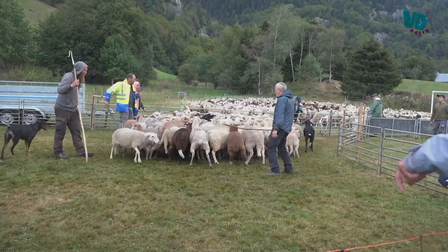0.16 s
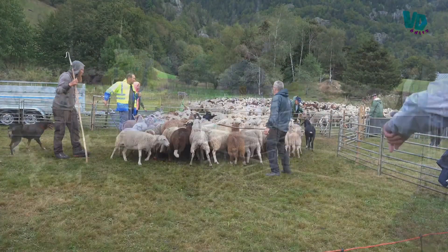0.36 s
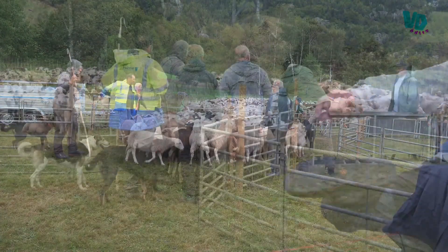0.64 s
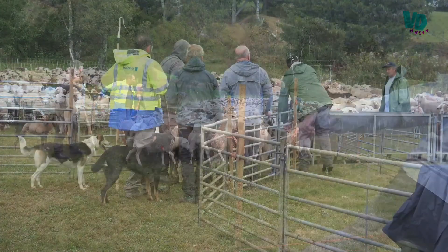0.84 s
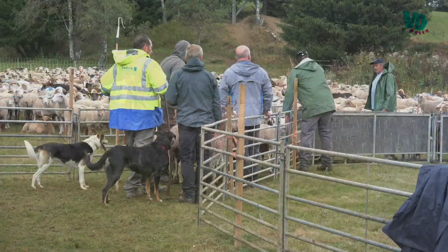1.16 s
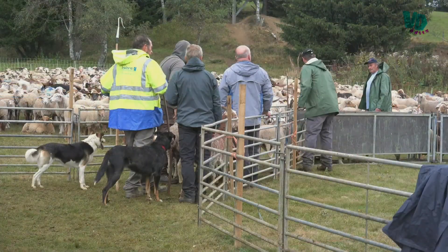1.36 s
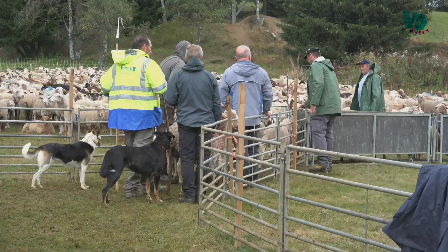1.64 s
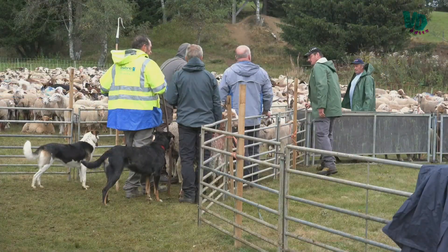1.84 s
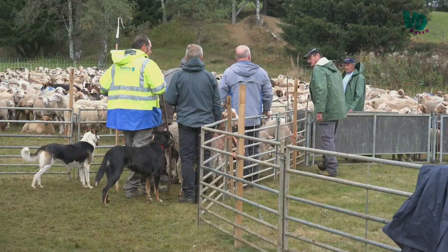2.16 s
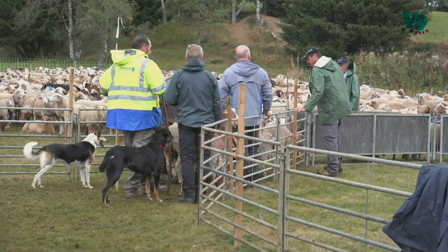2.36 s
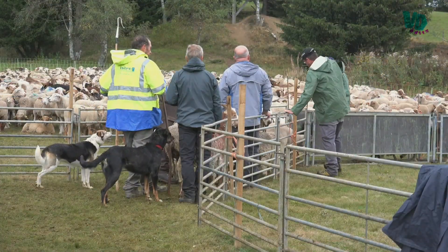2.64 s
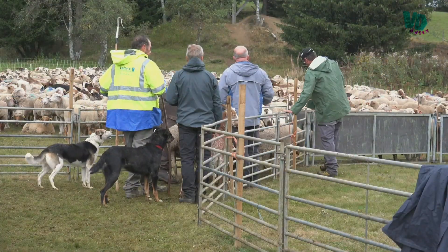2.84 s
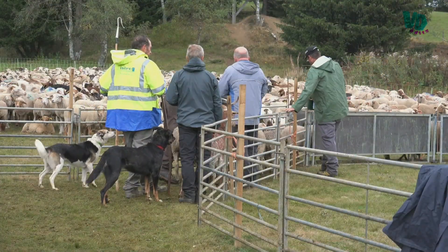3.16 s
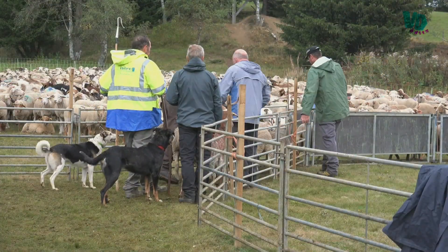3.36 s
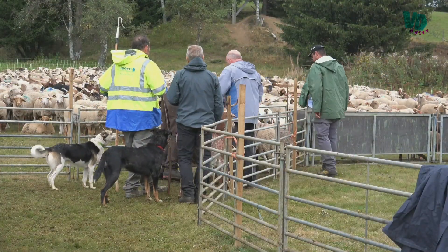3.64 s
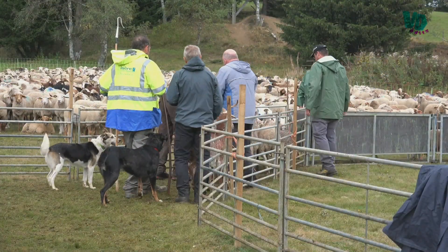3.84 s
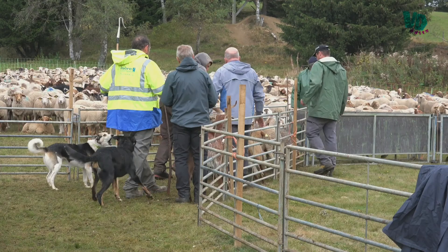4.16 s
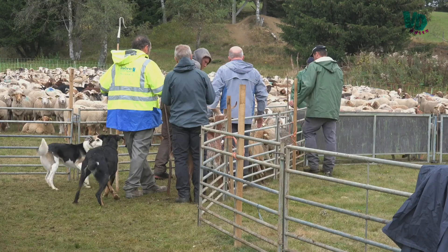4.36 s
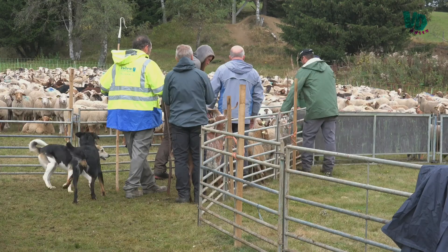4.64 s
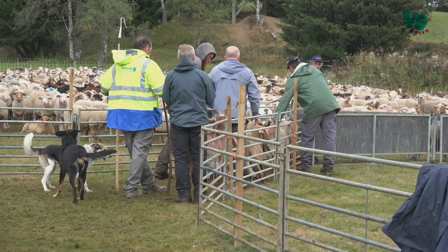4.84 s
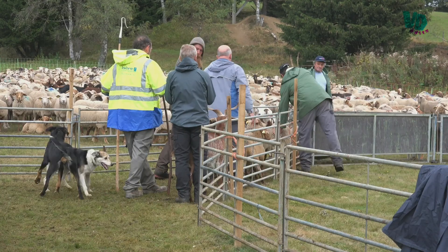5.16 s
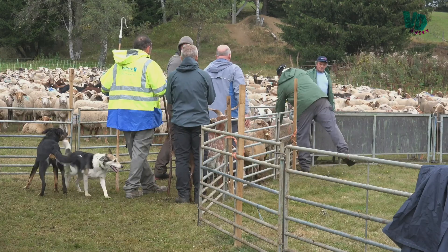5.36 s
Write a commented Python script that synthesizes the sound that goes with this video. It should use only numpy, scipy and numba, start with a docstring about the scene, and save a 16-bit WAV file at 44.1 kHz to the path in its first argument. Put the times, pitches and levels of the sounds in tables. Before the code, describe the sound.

In an open field, a ewe gives five low, throbbing bleats, each opened by a grunt, some close on the left and some further off. A goat stutters twice under the near calls, and a lamb twice answers with a long, shrill quaver toward the right. Short hoarse hisses, small yelps and faint ticks fall among the calls, over a quiet hiss and hum.

```python
"""Outdoors, in a collage of repeated sheep and goat calls. A ewe's low throbbing bleat, opened by a
grunt, sounds five times, near on the left or further off; a lamb's shrill quaver and a goat's stutter
each sound twice. Yelps, ticks and hoarse hisses fall among them, over a quiet hum. The voices follow
the source-filter principle: pulses of the vocal folds and turbulent breath excite the throat's resonances.
The lamb's is a harmonic series modulated in frequency. Scattering gives each call a short tail."""
import sys
import numpy as np
from scipy import signal
from scipy.fft import rfft, irfft
from scipy.io import wavfile
from scipy.ndimage import uniform_filter1d
from numba import njit

SR = 44100
rng = np.random.default_rng(int(sys.argv[2]) if len(sys.argv) > 2 else 0)


def put_to_file(sound):
    """Save the sound as 16-bit audio at rate SR, in the file named by the first command-line argument."""
    columns = np.atleast_2d(sound).T  # one column per channel
    safe = np.clip(columns, -1, 1)
    whole_steps = np.round(safe * 32767)
    wavfile.write(sys.argv[1], SR, whole_steps.astype(np.int16))


N = 242265


def undb(db):
    """Amplitude ratio of a level in decibels."""
    return 10 ** (np.asarray(db) / 20)


def unit(x):
    """Normalisation to rms 1."""
    return x / np.sqrt(np.mean(x ** 2))


def lowpass(x, hz, order):
    """Butterworth attenuation above hz."""
    return signal.sosfilt(signal.butter(order, hz, fs=SR, output="sos"), x)


def colour(hz, points):
    """Spectral envelope: the gain at hz, interpolated over log frequency."""
    f, db = np.transpose(points)
    return undb(np.interp(np.log(np.maximum(hz, 1)), np.log(f), db))


def noise(count, points):
    """Spectral shaping: noise whose level per third octave follows the points."""
    hz = np.arange(count // 2 + 1) * SR / count
    band_hz = .23 * hz + 1
    white = rfft(rng.standard_normal(count))
    return irfft(white * colour(hz, points) * np.sqrt(SR / 2 / band_hz), count)


def resonate(x, modes):
    """Damped resonators in parallel, neighbours in opposite sign."""
    out = 0
    for k, (hz, width, db) in enumerate(modes):
        r = np.exp(-np.pi * width / SR)
        poles = [1, -2 * r * np.cos(2 * np.pi * hz / SR), r * r]
        out = out + (-1) ** k * undb(db) * signal.lfilter([1 - r, 0, r - 1], poles, x)
    return out


def add(out, x, start, left_db, right_db):
    """Superposition: x joins the mix, reaching the right one sample before the left."""
    for ch, db in enumerate((left_db, right_db)):
        i = int(start * SR) + 1 - ch
        y = np.atleast_2d(x)[ch % np.ndim(x), :N - i]
        out[ch, i:i + len(y)] += y * undb(db)


def outdoors(x, t60=.23, scatter_db=-14.5):
    """Scattering off pens and ground: the direct sound, then a different decaying tail on each side."""
    t = np.arange(int(t60 * SR)) / SR
    response = rng.standard_normal((2, len(t))) * 1000. ** (-t / t60) * (t > .004)
    response *= undb(scatter_db) / np.sqrt(np.sum(response ** 2, axis=1, keepdims=True))
    response[:, 0] = 1
    return signal.fftconvolve(x[None], response, axes=1)


def ports(x, points):
    """Directional cues: level and phase differ between two microphone ports, varying with frequency."""
    hz = np.arange(x.shape[1] // 2 + 1) * SR / x.shape[1]
    f, db, lead = np.transpose(points)
    db, lead = (np.interp(np.log(hz + 1), np.log(f), c) for c in (db, lead))
    return irfft(rfft(x) * undb(np.outer([1, -1], db) / 2) * np.exp(np.outer([0, -1j], lead)), x.shape[1])


@njit
def glottal_pulses(hz, rough, jitter, shimmer):
    """Quasi-periodic oscillation: one pulse a cycle, its timing and size scattered by roughness."""
    pulses, phase = np.zeros(len(hz) + 1), np.empty(len(hz))
    p, cycle = 0., 0
    for i in range(len(hz)):
        step = hz[i] * (1 + rough[i] * jitter[cycle]) / SR
        p += step
        if p >= 1:
            p, cycle = p - 1, cycle + 1
            size = np.exp(rough[i] * shimmer[cycle])
            pulses[i] += size * p / step
            pulses[i + 1] += size * (1 - p / step)
        phase[i] = p
    return pulses[:-1], phase


def vocal_folds(hz, rough, jitter=.1, shimmer=.4, puff_cycles=.97):
    """Glottal source: closing pulses, and a decaying puff of turbulent air after each."""
    chance = rng.standard_normal((len(hz) // 20 + 9, 2)).T
    pulses, phase = glottal_pulses(hz, rough, jitter * np.clip(chance[0], -2, 2), shimmer * chance[1])
    air = np.exp(-phase / puff_cycles) * rng.standard_normal(len(hz))
    return unit(pulses), unit(air)


def syllable(length, hz, glide, low_hz, low_db, rasp_db, rough, arch=.12):
    """Source and filter: one push of breath, arched in pitch, excites a low resonance and a rasp."""
    # upper throat formants: (frequency [Hz], bandwidth [Hz], gain [dB])
    throat = [(942, 250, 4.5), (1580, 280, -0.5), (2290, 920, -3), (3220, 110, 7), (3850, 840, 0.5),
              (4610, 190, 1)]
    u = np.linspace(0, 1, int(length * SR))
    pitch = hz * (1 + glide * (u - .5) + arch * np.sin(np.pi * u))
    pulses, air = vocal_folds(pitch, np.full(len(u), rough))
    breath = np.sin(np.pi * u ** 1.23) ** .5
    low = resonate(pulses + rough * air, [(low_hz, 160, 0)])
    low = resonate(low, [(low_hz, 400, 0)])
    rasp = lowpass(resonate(pulses + (.25 + 2 * rough) * air, throat), 5000, order=4)
    return breath * (undb(low_db) * unit(low) + undb(rasp_db) * unit(rasp))


def background(t):
    """Ambient floor: broadband noise, uncorrelated between the sides, and a pure-tone hum."""
    # noise spectrum: (frequency [Hz], third-octave level [dB])
    spectrum = [(25, -60), (60, -74), (110, -68), (250, -65), (500, -66), (1000, -62.5), (3000, -70.5),
                (6700, -70), (9000, -68.5), (14500, -62.5)]
    # hum: (frequency [Hz], peak level [dB])
    hum = (100, -60.5)
    floor = np.array([noise(N, spectrum) for ch in range(2)])
    return floor + undb(hum[1]) * np.sin(2 * np.pi * hum[0] * t)


def hoarse_hiss(t, rise_db_per_s=256):
    """Amplitude-modulated noise: each burst swells exponentially and fades at its own rate."""
    # bursts: (peak time [s], peak level [dB], decay rate [dB/s], left minus right [dB])
    bursts = [(1.288, -21, 448, .6), (1.398, -18.5, 500, 2), (1.504, -24.5, 118, 2), (1.666, -40, 250, 1),
              (1.75, -38, 900, -2), (2.45, -34, 450, -6), (2.526, -21.5, 330, -2), (2.606, -20.5, 264, 0),
              (2.69, -21.5, 292, 0), (2.798, -30, 144, 0.5), (2.902, -35, 294, 0), (4.24, -31, 117, -1),
              (5.114, -26, 30, 1), (5.2, -18.5, 170, 2), (5.313, -16.5, 270, 1.5), (5.416, -20.5, 146, .6)]
    # hiss spectrum: (frequency [Hz], relative third-octave level [dB])
    spectrum = [(600, -40), (1500, -9), (3500, -13), (6000, -5), (8500, -8), (11500, -10), (14500, -30)]
    peak_s, peak_db, fade, pan_db = np.transpose(bursts)[:, :, None]
    swell = undb(peak_db - np.where(t < peak_s, rise_db_per_s * (peak_s - t), fade * (t - peak_s)))
    level = np.array([np.max(swell * undb(side * pan_db / 2), axis=0) for side in (1, -1)])
    hiss = np.array([unit(noise(N, spectrum)) for ch in range(2)])
    return hiss * uniform_filter1d(level, size=400)


def add_ticks(out, decay_s=.0026):
    """Damped oscillation: each tick is one quickly decaying sinusoid."""
    # ticks: (time [s], level [dB], frequency [Hz], left minus right [dB])
    ticks = [(3.099, -31, 673, 1.5), (3.131, -30.5, 612, 2), (3.49, -43, 3900, -3), (3.508, -40, 3900, 13)]
    t = np.arange(900) / SR
    for start, db, hz, pan_db in ticks:
        tick = np.sin(2 * np.pi * hz * t) * np.exp(-t / decay_s)
        add(out, tick, start, db + pan_db / 2, db - pan_db / 2)


def add_yelps(out):
    """Brief phonation: single syllables from other animals."""
    # yelps: (time [s], length [s], pitch [Hz], glide [share of pitch], low resonance [Hz],
    # low level [dB], rasp level [dB], roughness [0-1], left minus right [dB])
    yelps = [(2.74, 0.0736, 603, 0.0048, 1235, -33, -29, 0.14, .6),
             (2.855, 0.0647, 534, 0.11, 1044, -37.5, -35, 0.18, 1.2),
             (3.156, 0.051, 300.5, -0.19, 443, -42.5, -55.5, 0.26, 8.8),
             (4.294, 0.058, 505, 0.31, 1065, -38, -33, 0.17, 2.1)]
    for start, *voice, pan_db in yelps:
        add(out, outdoors(syllable(*voice)), start, pan_db / 2, -pan_db / 2)


def goat():
    """Interrupted phonation: short pushes of breath make a stutter."""
    # syllables: (time [s], length [s], pitch [Hz], glide [share of pitch], low resonance [Hz],
    # low level [dB], rasp level [dB], roughness [0-1])
    stutter = [(0, .058, 297, .15, 335, -30.5, -37.5, 0.16),
               (.115, 0.068, 290.5, 0.092, 327, -29, -35.5, 0.2),
               (0.233, .078, 323, -0.18, 337, -34, -25.5, 0.68),
               (.36, 0.08, 340, 0.16, 362, -32, -16, 0.71), (.475, 0.055, 320, 0.41, 406, -34, -16.5, 0.37),
               (.59, 0.096, 221.6, -0.33, 550, -21.5, -25, 0.1),
               (.715, .087, 223.7, -.22, 480, -22.5, -39, 0.1),
               (.795, 0.074, 172.6, 0.13, 485, -33, -57, 0.2),
               (.855, 0.023, 210, 0.52, 423, -32.5, -89, 0.1)]
    out = np.zeros((2, N))
    for start, *voice in stutter:
        add(out, syllable(*voice), start, 0, 0)
    return outdoors(out[0, :SR])


def lamb(first_dip_s=.096, quaver_s=.0835, slowing_s=.00056, end_s=1.192):
    """Vibrato and tremolo: harmonics swing in pitch and level under a wandering mouth resonance."""
    # course of the call: (time [s], middle pitch [Hz], swing [Hz], level at pitch dips [dB],
    # level at pitch tops [dB], mouth resonance [Hz])
    contour = [(0.055, 695, 21, -26.5, -17, 4890), (.16, 678, 39, -17, -31, 4127),
               (.27, 660.4, 35, -16.5, -27, 4130), (.43, 654, 35, -16.5, -19.5, 4560),
               (.62, 652.8, 38.6, -14.5, -22.5, 4810), (.74, 650, 42, -16, -21.5, 5390),
               (.87, 657, 32, -18.5, -30, 4800), (1.041, 669.5, 21, -14.5, -26.5, 5230),
               (1.13, 640, 40, -21, -30, 5100)]
    # envelope of the harmonics: (frequency [Hz], relative level [dB])
    spectrum = [(650, -28.5), (1300, -14.5), (1950, -12), (2600, -19), (3300, -13), (4500, -11),
                (6000, -15.5), (7500, -41.5), (9500, -49), (13500, -18.5), (14600, -50)]
    # high hiss that comes and goes with the lamb's call: (frequency [Hz], third-octave level [dB])
    hiss_spectrum = [(900, -86), (1500, -53), (3000, -51), (5000, -48), (7000, -37), (9000, -62),
                     (11500, -31), (13500, -23), (14500, -26), (15000, -66)]
    # port differences: (frequency [Hz], left minus right [dB], phase lead of left [rad])
    direction = [(640, 13, 2.1), (1413, 9.5, 0.8), (2400, 16, -1.25), (3800, -4.5, -1), (4494, -5, -1.18),
                 (6500, 0, -1), (14000, 10.5, -2.1)]
    t = np.arange(int(1.2 * SR)) / SR
    times, *columns = np.transpose(contour)
    mid_hz, swing_hz, dip_db, top_db, mouth_hz = (np.interp(t, times, c) for c in columns)
    n = np.arange(-2., 16)
    dip_times = first_dip_s + quaver_s * n + slowing_s * n ** 2 / 2
    turn = 2 * np.pi * np.interp(t, dip_times, n)
    dip = np.cos(turn + .18 * (np.cos(turn) - 1))  # skewed: fall and climb take unequal times
    wobble_hz = 2.7 * unit(uniform_filter1d(rng.standard_normal(len(t)), size=90))
    pitch = mid_hz - swing_hz * dip + wobble_hz
    k = np.arange(1, 23)[:, None]
    mouth = 1 + 4.6 / (1 + ((k * pitch - mouth_hz) / 400.) ** 2)
    gain = colour(k * pitch, spectrum) * mouth
    gain /= np.sqrt(np.sum(gain ** 2, axis=0) / 2)
    # every harmonic flutters on its own
    gain *= 1 + .25 * unit(uniform_filter1d(rng.standard_normal(gain.shape), size=150, axis=1))
    voice = np.sum(gain * np.sin(k * np.cumsum(pitch) * 2 * np.pi / SR), axis=0)
    level = undb(top_db + (dip_db - top_db) * (1 + dip) / 2)
    hiss = np.array([noise(len(t), hiss_spectrum) for ch in range(2)]) * (level / level.max()) ** .37
    gate = np.clip(t / .09, 0, 1) ** 3 * np.clip((end_s - t) / .05, 0, 1) ** 2
    return ports(outdoors(gate * voice * level)[:, :len(t)] + gate * hiss, direction)


def ewe_breath(t, count=8, first_s=.146, period_s=.0766, rise_s=.015, fall_s=.007, sag=.06):
    """Modulation by breath: throbs swell slowly and stop fast; between them the folds slacken."""
    k = np.arange(count)
    first, last = k == 0, k == k[-1]
    peak_s = first_s + period_s * k + .003 * last
    since = t - peak_s[:, None]
    throbs = np.exp(-.5 * (since / np.where(since < 0, rise_s, fall_s)) ** 2)
    push = undb(np.where(first, -8.5, -5)) @ throbs
    lull_s = np.r_[peak_s[0] - .04, peak_s + .025, peak_s[-1] + .05]
    lull_db = np.r_[-60, np.where(last, -33, -17.5 + .38 * k), -80]
    lull = undb(np.interp(t, lull_s, lull_db))
    slack = 1 - throbs.max(0)
    pitch = np.interp(t, peak_s, np.where(first, 184.44, 184.96)) * (1 - sag * slack)
    rough = .1 + .3 * slack
    return push, lull, pitch, rough


def ewe(thud_hz=32.3, thud_db=-38):
    """Source and filter: after a grunt, throbbing pulses and air excite the formants of the throat."""
    # formants: (frequency [Hz], bandwidth [Hz], gain [dB])
    throat = [(55, 77, -23), (377, 333, -13), (820.3, 50.5, 6.5), (2093, 92, 2.5), (3060, 197, -2),
              (3940, 510, -11)]
    # rasp resonances: (frequency [Hz], bandwidth [Hz], gain [dB])
    rasp = [(3314, 483, -10.5), (6240, 950, -17.5), (7570, 1270, -20.5), (11900, 7600, -35.5)]
    # opening grunt: (time [s], length [s], pitch [Hz], glide [share of pitch], low resonance [Hz],
    # low level [dB], rasp level [dB], roughness [0-1])
    grunt = (.03, .054, 148.5, -0.44, 244.5, -25, -26.5, 0.7)
    # port differences: (frequency [Hz], left minus right [dB], phase lead of left [rad])
    direction = [(110, -2.5, .3), (380, -2.5, 0.84), (700, 2.5, -0.32), (1300, 2.3, -0.28),
                 (2400, -1.5, -0.28), (4400, -6, -0.88), (8070, -7, 0.0059)]
    samples = np.arange(int(.8 * SR))
    t = samples / SR
    push, lull, pitch, rough = ewe_breath(t)
    pulses, air = vocal_folds(pitch, rough)
    steady_rms = np.sqrt(np.mean(resonate(pulses, throat) ** 2))
    source = push * (pulses + .5 * air) + lull * (.44 * pulses + .47 * air)
    voice = lowpass(resonate(source, throat), 5000, order=2)
    voice += resonate((push + lull) * (air + .37 * pulses), rasp)
    # the mouth is still opening in the first throb: stretching time lowers its resonances and pitch
    warped = samples + SR * .0044 * np.exp(-np.maximum(t - .11, 0) / .035)
    call = np.array([np.interp(warped, samples, voice) / steady_rms] * 2)
    add(call, syllable(*grunt[1:]), grunt[0], 0, 0)
    thud = lowpass(rng.standard_normal((2, len(t))), thud_hz, order=2)  # rumble under each throb
    call = ports(outdoors(call[0]), direction)
    add(call, unit(thud) * (push + lull), 0, thud_db, thud_db)
    return call


def scene(duck_db=-23):
    """Superposition of all sources; the background is turned down while the others are loud."""
    # each animal's calls: (time [s], left gain [dB], right gain [dB])
    ewe_calls = [(0.094, -1, -8.5), (1.298, -12, -10.5), (2.0, -1, -8), (3.509, -1, -8),
                 (4.718, -11.5, -11)]
    lamb_calls = [(1.017, -13, -2.5), (4.268, -13.5, -1.36)]
    goat_calls = [(.056, 0.014, -11), (3.29, 0.0022, -10)]
    t = np.arange(N) / SR
    out = hoarse_hiss(t)
    for sound, calls in ((ewe(), ewe_calls), (lamb(), lamb_calls), (goat(), goat_calls)):
        for call in calls:
            add(out, sound, *call)
    add_yelps(out)
    add_ticks(out)
    running_rms = np.sqrt(uniform_filter1d(np.mean(out ** 2, axis=0), size=4000).clip(0))
    return out + background(t) / (1 + running_rms / undb(duck_db))


def record(dry, ceiling=1.05, top_hz=15500):
    """Hard clipping flattens the loudest throbs; a steep low-pass limits the bandwidth."""
    clipped = np.clip(dry, -ceiling, ceiling)
    return signal.sosfilt(signal.ellip(8, .2, 70, top_hz, fs=SR, output="sos"), clipped)


dry = scene()
out = record(dry)
put_to_file(out)
```